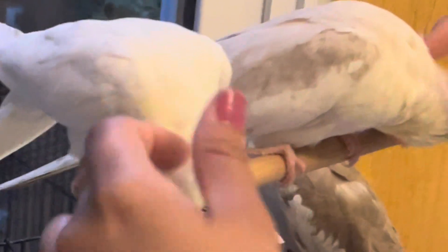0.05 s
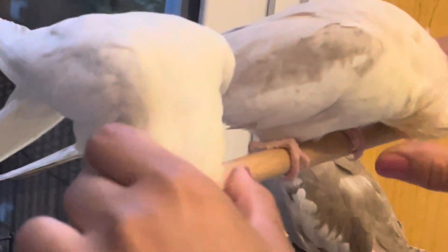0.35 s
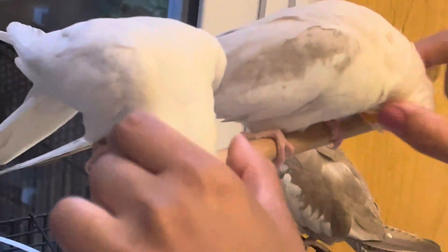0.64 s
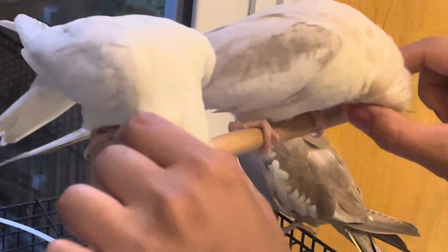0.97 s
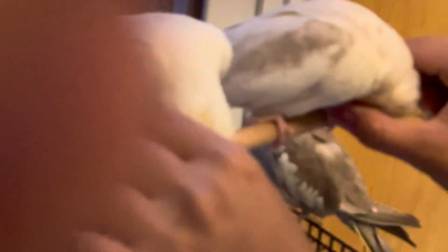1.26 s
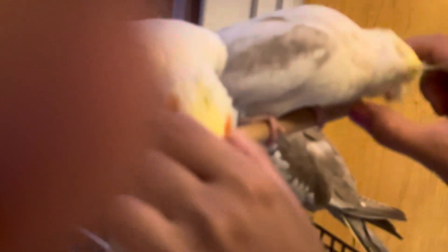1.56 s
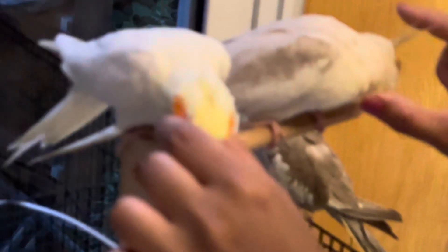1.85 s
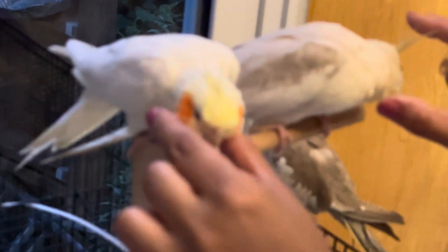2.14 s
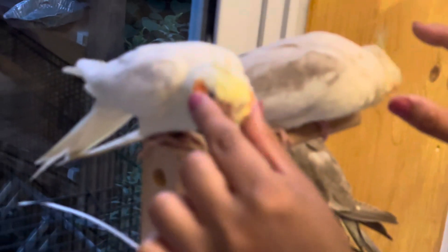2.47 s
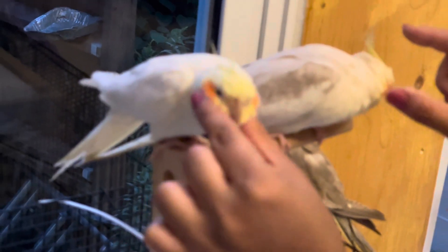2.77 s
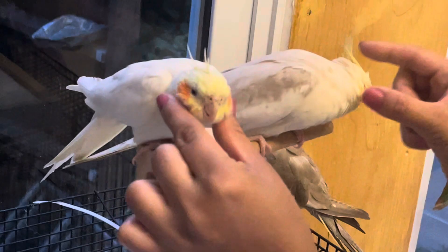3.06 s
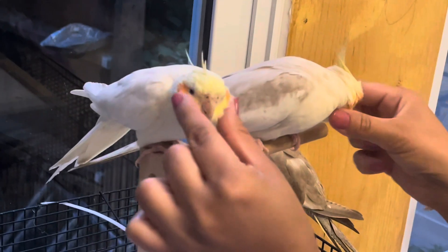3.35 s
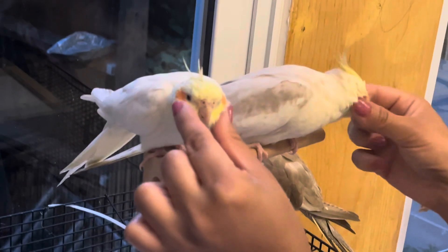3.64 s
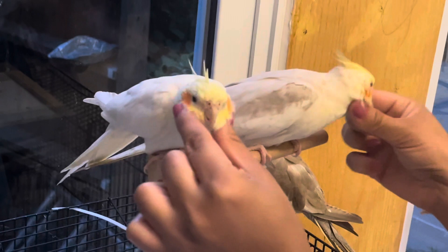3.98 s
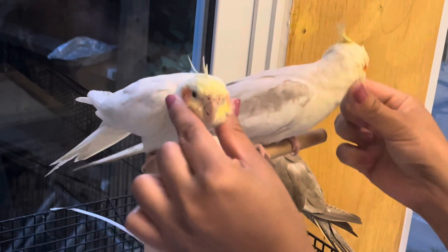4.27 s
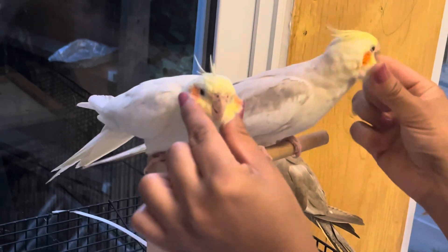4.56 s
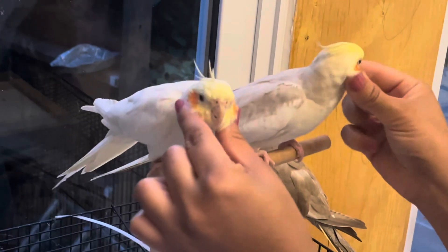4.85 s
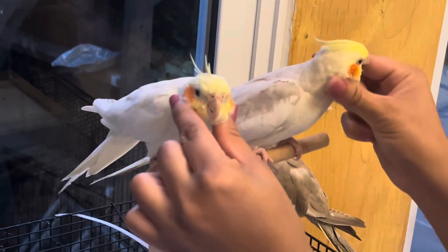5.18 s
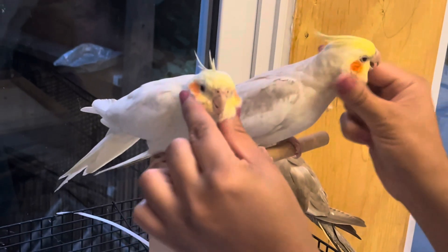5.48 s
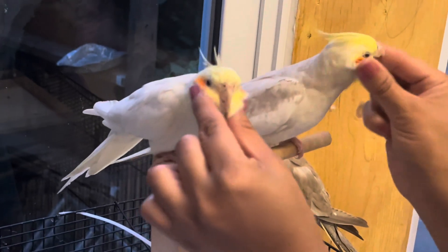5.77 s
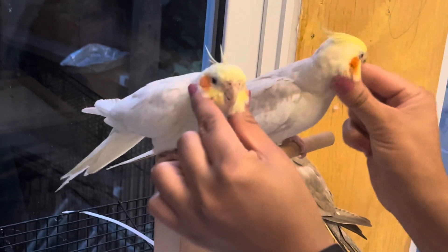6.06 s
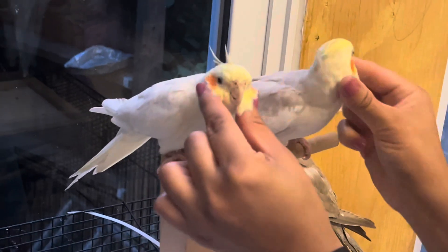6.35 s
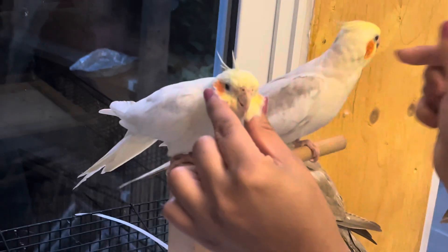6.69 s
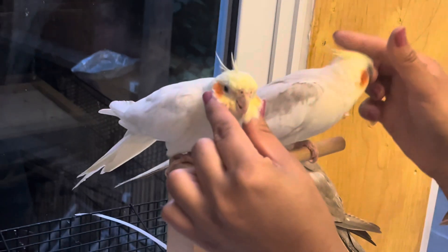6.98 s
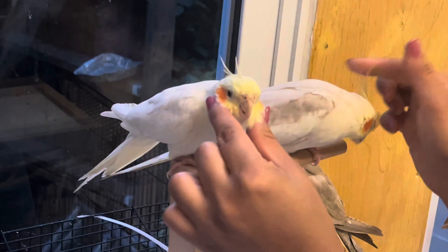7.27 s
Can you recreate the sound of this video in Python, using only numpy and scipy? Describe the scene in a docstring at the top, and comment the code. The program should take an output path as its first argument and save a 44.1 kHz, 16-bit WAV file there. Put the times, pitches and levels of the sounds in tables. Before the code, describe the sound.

A faint appliance hum and a soft rumble of air fill a small room, where two cockatiels are heard close to a phone. One gives high, nearly pure peeps and later thin, quavering whines. The other cuts in five times with short, harsh, louder squawks, the last two close together near the end. Tiny beak clicks and soft feather rustles fall between the calls, and a quick rustle comes last.

```python
"""Two cockatiels have their heads scratched, close to a phone in a small room. From the start an
appliance hums over a soft rumble of air. One bird gives clean peeps, the nearly pure tones of a
vibrating membrane, while beaks tick and feathers rustle. At 0.7 s the other first protests: its squawk
opens reedy, then breaks into a screech as the membrane turns chaotic. From 1.9 s the first bird adds
sagging whines. The calls alternate until two last squawks, near 6.5 s; a brief rustle ends the scene."""
import sys
import numpy as np
from scipy import signal
from scipy.fft import rfft, irfft, next_fast_len
from scipy.io import wavfile
from scipy.ndimage import uniform_filter1d

SR = 44100
rng = np.random.default_rng(int(sys.argv[2]) if len(sys.argv) > 2 else 0)


def put_to_file(sound):
    """Save the sound as 16-bit audio at rate SR, in the file named by the first command-line argument."""
    columns = np.atleast_2d(sound).T  # one column per channel
    safe = np.clip(columns, -1, 1)
    whole_steps = np.round(safe * 32767)
    wavfile.write(sys.argv[1], SR, whole_steps.astype(np.int16))


N = 327222
TIME = np.arange(N) / SR
TOP_HZ = 15500

# Spectrum of the moving air. Each row: frequency in Hz, relative density in dB.
AIR_SPECTRUM = [(22, -41.5), (32, -12), (41, 1.5), (55, 2), (85, -4.5), (140, -12.5), (230, -8.5),
                (330, -14.5), (500, -22), (1000, -31), (2400, -44), (3200, -52), (7000, -53), (12000, -50)]
# Stereo width of the air. Each row: frequency in Hz, side against mid in dB.
AIR_SIDE = [(30, -25), (90, -15), (200, -10.5), (600, -7), (8000, -6.5)]
# Partials of the appliance. Each row: frequency in Hz, median rms level in dB.
HUM_PARTIALS = [(58, -61.5), (231, -60.5), (349.9, -74)]
# Peeps. Each row: start in seconds, length in seconds, pitch in Hz, level in dB, overtone gain in dB.
PEEP_NOTES = [ (.223, 0.024, 2722, -37.5, -11.5), (0.309, 0.038, 2552, -42, -14),
              (0.411, 0.037, 2432, -43.5, -20.5), (0.558, 0.038, 2463, -43.5, -18.5),
              (1.279, 0.012, 4870, -67, -27.5), (1.753, 0.023, 2613, -39.5, -6.5),
              (1.896, .024, 2540, -46.5, -4.5), (3.682, .024, 2013, -43, 5),
              (4.681, 0.037, 2725, -39.5, -3.5), (4.771, .031, 2466, -48, -1.5),
              (4.865, 0.035, 2462, -47, -3), (6.022, 0.011, 2770, -57.5, -15.5),
              (6.097, .016, 2690, -57, -22)]
# Transmission of overtones by the nearly closed beak. Each row: frequency in Hz, gain in dB.
BEAK_RESPONSE = [(5000, -4), (7600, -17), (10000, -20), (13000, -41.5)]
# Impacts of beaks and claws. Each row: start in seconds, strength in dB, ring frequency in Hz.
HORN_IMPACTS = [(0.225, -37.5, 2870), (0.422, -48.5, 3380), (.987, -36.5, 11500), (1.749, -37.5, 3270),
                (4.698, -40, 3560), (4.772, -42, 3200), (5.052, -42.5, 2510), (5.094, -49.5, 2850),
                (5.195, -57.5, 3400), (5.26, -50, 3300), (5.279, -55.5, 5950), (5.689, -49, 2264),
                (6.068, -37, 2295), (6.085, -40.5, 2450)]
# Feather strokes. Each row: start in seconds, length in seconds, level before the mix in dB, centre in Hz.
FEATHER_STROKES = [(0.346, .03, -67.5, 10700), (0.589, 0.039, -63, 9600), (.72, .26, -53, 12300),
                   (1.111, 0.043, -56.5, 10600), (1.422, 0.052, -55, 8580), (1.545, 0.057, -58.5, 10640),
                   (1.932, 0.083, -68, 7200), (4.274, 0.11, -72.5, 6030), (6.065, 0.038, -62, 8540),
                   (6.255, .1, -54.5, 7200), (7.39, 0.016, -47, 10100), (7.41, 0.0092, -35, 7520)]
# Squawks. Each row: start, length, scoop time and time to the break in seconds; first, opening, screech
# and last pitch in Hz; opening and screech level before the mix in dB; fade over the screech in dB;
# screech roughness from 0 to 1; opening and screech tilt of the membrane's spectrum in dB per octave.
SQUAWK_CALLS = [ (0.702, .18, .038, 0.06, 1320, 1630, 2138, 951, -29, -26.5, 9, 0.83, 1.5, -4.5),
                (2.324, 0.15, .027, 0.06, 1383, 1520, 2203, 1407, -30.5, -20.5, 17.5, 0.78, -1, -3),
                (3.69, .147, .042, .063, 927, 1311, 2610, 2678, -24, -17.5, 18.5, .62, -2.5, -4.5),
                (6.465, .113, .038, .042, 1345, 1597, 2010, 1770, -34.5, -29.5, 18.5, 0.65, -3, 5.5),
                (6.639, 0.15, .026, .057, 1299, 1594, 2028, 1156, -26, -26.5, 9, 0.76, 1.5, -5.5)]
# Throat resonances, which shift as neck and beak move. Each row: one squawk's pairs of frequency in Hz
# and gain in dB.
THROAT_RESONANCES = [
    [(1850, -9), (2300, 16), (3380, 7), (4420, -34.5), (5900, -13), (7100, -11), (8600, -8.5)],
    [(1850, -11.5), (2270, 9.5), (3350, 2), (4570, -5), (5950, -12), (7300, -17), (8800, -7.5)],
    [(1850, -9.5), (2650, 3.5), (3880, 1.5), (5120, -16.5), (6000, -25), (7800, -4.5), (11600, -7)],
    [(1850, -23), (2150, 21), (3400, 10.5), (5000, -0.5), (6300, -18), (7100, -1.5), (8500, -5)],
    [(1800, 6), (2250, 21), (3250, 11.5), (4750, 4.5), (6300, -9), (8100, 2.5), (9300, -33)],
]
# Whines. Each row: start and length in seconds, first and lowest pitch in Hz, sag time in seconds,
# level in dB, overtone gain in dB, quaver as a share of the pitch, strength of beak chatter in dB.
WHINE_NOTES = [ (1.938, .24, 2448, 2328, 0.054, -49.5, -5.5, 0.016, -53.5),
               (3.257, 0.29, 2720, 2340, 0.23, -46.5, -4.5, .021, -51),
               (6.166, 0.152, 2614, 2330, .16, -44.5, -3.5, 0.011, -47)]
# Treble resonances of the microphone ports. Each row: frequency in Hz, gain in dB.
PORT_RESPONSE = [(9300, 0.5), (10200, -15.5), (11200, 4), (12600, -8), (13600, -22)]


def undb(db):
    """Amplitude ratio of a level in decibels."""
    return 10 ** (np.asarray(db) / 20)


def unit(x):
    """Normalisation to rms 1."""
    return x / np.sqrt(np.mean(x ** 2) + 1e-20)


def response(points, hz):
    """Gain of a (Hz, dB) curve, interpolated over log frequency."""
    at, db = np.transpose(points)
    return undb(np.interp(np.log(np.maximum(hz, 1)), np.log(at), db))


def colour(x, points):
    """Zero-phase filtering by a (Hz, dB) curve."""
    size = next_fast_len(len(x))
    hz = np.arange(size // 2 + 1) * SR / size
    return irfft(rfft(x, size) * response(points, hz), size)[:len(x)]


def wobble(size, rate_hz):
    """Low-passed noise: smooth random motion of rms 1."""
    lowpass = signal.butter(2, rate_hz, fs=SR, output="sos")
    return unit(signal.sosfilt(lowpass, rng.standard_normal(size)))


def add(out, start, sound):
    """Superposition of a sound at its start time."""
    i = max(int(start * SR), 0)
    out[i:i + len(sound)] += sound[:max(N - i, 0)]


def blend(a, b, share):
    """Linear interpolation from a to b."""
    return a + (b - a) * share


def ease(x):
    """Raised-cosine step from 0 to 1."""
    return np.sin(np.pi / 2 * np.clip(x, 0, 1)) ** 2


def envelope(length_s, attack_s, release_s):
    """Time axis and amplitude envelope of one call."""
    t = TIME[:int(length_s * SR)]
    return t, ease(t / attack_s) * ease((length_s - t) / release_s)


def room_air(mid_db=-55.5):
    """Moving air gives low noise, partly correlated between the two channels."""
    mid, side = (unit(colour(rng.standard_normal(N), AIR_SPECTRUM)) for _ in range(2))
    return undb(mid_db) * (mid + colour(side, AIR_SIDE) * np.array([[1], [-1]]))


def appliance_hum(drift=0.012, throb_db=2.5):
    """Low partials waver under slow random modulation of frequency and amplitude."""
    out = np.zeros(N)
    for hz, db in HUM_PARTIALS:
        gain = undb(db + throb_db * wobble(N, 15))
        drifting_hz = hz * (1 + drift * wobble(N, 5))
        out += gain * unit(np.sin(2 * np.pi * np.cumsum(drifting_hz) / SR))
    return out


def syrinx(hz, weights):
    """A periodically vibrating membrane gives a harmonic series, one row of weights per harmonic."""
    k = np.arange(1, len(weights) + 1)[:, None]
    weights = weights * (k * hz < TOP_HZ)
    phase = 2 * np.pi * np.cumsum(hz) / SR
    rms = np.sqrt((weights ** 2).sum(axis=0) / 2 + 1e-20)
    return (weights * np.sin(k * phase)).sum(axis=0) / rms


def whistle(hz, overtone_db, waver, air_db, shimmer_db=3, count=5):
    """The closed beak acts as a low-pass filter, leaving a trembling, nearly pure tone and faint breath."""
    hz = hz * (1 + waver * wobble(len(hz), 99))
    overtones = [undb(overtone_db) * response(BEAK_RESPONSE, k * hz) for k in range(2, count + 1)]
    tone = syrinx(hz, np.array([np.ones(len(hz))] + overtones))
    breath = colour(rng.standard_normal(len(hz)), [(1500, -24.5), (3000, 9.5)] + BEAK_RESPONSE)
    shimmer = undb(shimmer_db * wobble(len(hz), 71))
    return (tone + undb(air_db + overtone_db) * unit(breath)) * shimmer


def peeps(sharp=0.04, settle_s=0.011):
    """Short contact notes with an onset transient: the pitch starts sharp and settles exponentially."""
    out = np.zeros(N)
    for start, length, pitch_hz, db, overtone_db in PEEP_NOTES:
        t, swell = envelope(length, attack_s=0.17 * length, release_s=0.45 * length)
        hz = pitch_hz * (1 + sharp * np.exp(-t / settle_s))
        add(out, start, swell * undb(db) * whistle(hz, overtone_db, waver=0.011, air_db=-21.5))
    return out


def ticks(impacts, crack=0.33, ring_s=0.001, crack_s=0.0015):
    """An impact on hard horn excites a tiny crack and one heavily damped mode."""
    out, t = np.zeros(N), TIME[:SR // 50]
    for start, db, hz in impacts:
        snap = crack * rng.standard_normal(len(t)) * np.exp(-t / crack_s)
        ring = np.sin(2 * np.pi * hz * t) * np.exp(-t / ring_s)
        band = [(hz / 4, -18), (hz / 2, -3), (hz, 0), (hz * 3, -14)]
        add(out, start, undb(db) * colour(ring + snap, band))
    return out


def rustles(grain_db=3):
    """Friction between sliding feather barbs gives a grainy band of noise."""
    out = np.zeros(N)
    for start, length, db, hz in FEATHER_STROKES:
        size = int(length * SR)
        barbs = rng.standard_normal(size) * undb(grain_db * wobble(size, 500))
        swish = colour(barbs, [(hz / 10, -32), (hz / 2, -12), (hz, 0), (hz * 2, -26)])
        swell = np.sin(np.pi * np.linspace(0, 1, size) ** 0.7)
        add(out, start, undb(db) * unit(swish * swell))
    return out


def throat(x, resonances, q=10):
    """Windpipe and open beak act as resonators in parallel."""
    return sum(undb(db) * signal.lfilter(*signal.iirpeak(hz, q, fs=SR), x) for hz, db in resonances)


def forced_voice(hz, rough, tilt_db, resonances, jitter=0.18, flutter_db=3, rasp_db=-14, count=10):
    """Source and filter: a membrane driven into chaos and rasping air excite the same throat."""
    size, k = len(hz), np.arange(1, count + 1)[:, None]
    shaken_hz = hz * (1 + jitter * rough * np.tanh(wobble(size, 300)))
    tone = syrinx(shaken_hz, undb(tilt_db * np.log2(k)))
    rasp = undb(rasp_db) * rough * rng.standard_normal(size)
    voice = throat(tone + rasp, resonances)
    # so small a throat radiates almost no bass
    radiation = [(500, -31.5), (1000, -10.5), (1350, -11), (1800, 6), (9000, -0.5), (14000, -21.5)]
    voice = colour(voice, radiation)
    # effort alone sets the loudness, wherever the pitch lies among the resonances
    voice = voice / np.sqrt(uniform_filter1d(voice ** 2, size=400) + 1e-12)
    return voice * unit(undb(flutter_db * rough * wobble(size, 230)))


def squawks(scoop_db=11.5, push_db=3, dull_db=10.5, opening_rough=0.26, closing_rough=0.5):
    """A change of regime: a reedy note scoops up, breaks into a screech and sags as the air runs out."""
    out = np.zeros(N)
    for row, resonances in zip(SQUAWK_CALLS, THROAT_RESONANCES):
        (start, length, scoop_s, break_s, first_hz, opening_hz, screech_hz, last_hz,
         opening_db, screech_db, fade_db, screech_rough, opening_tilt, screech_tilt) = row
        t, gate = envelope(length, attack_s=0.0057, release_s=0.005)
        effort = ease(t / scoop_s)
        broken = (1 + np.tanh((t - break_s) / 0.009)) / 2  # 0 in the opening, 1 in the screech
        spent = np.clip((t - break_s) / (length - break_s), 0, 1)
        sag = spent ** 2.8  # ever faster towards the end
        hz = blend(blend(first_hz, opening_hz, effort), blend(screech_hz, last_hz, sag), broken)
        rising_db = opening_db - scoop_db * (1 - effort)
        # a last push of air lifts the level halfway down the sag
        falling_db = screech_db - fade_db * spent + push_db * np.sin(np.pi * sag)
        db = blend(rising_db, falling_db, broken)
        rough = blend(opening_rough, blend(screech_rough, closing_rough, sag), broken)
        tilt_db = blend(opening_tilt, screech_tilt - dull_db * np.sin(np.pi * spent), broken)
        add(out, start, gate * undb(db) * forced_voice(hz, rough, tilt_db, resonances))
    return out


def whines(rise_hz_per_s=380, fade_db=3.5, dull_db=3.5):
    """Frequency glides: a fading, dulling whistle sags, then creeps back up if it lasts long enough."""
    out = np.zeros(N)
    for start, length, first_hz, lowest_hz, sag_s, db, overtone_db, quaver, _ in WHINE_NOTES:
        t, swell = envelope(length, attack_s=0.005, release_s=0.012)
        spent = t / length
        sagging_hz = blend(lowest_hz, first_hz, np.maximum(1 - t / sag_s, 0) ** 2)
        hz = sagging_hz + rise_hz_per_s * np.maximum(t - sag_s, 0)
        note = whistle(hz, overtone_db - dull_db * spent, quaver, air_db=-19)
        add(out, start, swell * undb(db - fade_db * spent) * note)
    return out


def beak_chatter(gap_s=0.026, scatter_db=3, ring_hz=3070):
    """A jittered train of faint beak impacts during each whine, as rows for ticks()."""
    impacts = []
    for start, length, *_, db in WHINE_NOTES:
        for slot in np.arange(start, start + length - gap_s, gap_s):
            impacts.append((slot + gap_s * rng.random(), db + scatter_db * rng.standard_normal(), ring_hz))
    return impacts


def room(x, wet_db, early_db, side_db, t60_s=0.49, early_s=0.016):
    """Reverberation: sparse reflections from the nearby door and window, and a diffuse decaying tail."""
    t = TIME[:int(0.75 * SR)]
    arrive = np.clip((t - 0.002) / 0.016, 0, 1)
    paths = []
    for _ in range(2):
        tail = rng.standard_normal(len(t)) * arrive * np.exp(-np.log(1000) * t / t60_s)
        tail = colour(tail, [(3000, 3.5), (9000, 0.5), (14000, -13)])
        sparse = rng.standard_normal(len(t)) * (rng.random(len(t)) < 0.02)
        early = sparse * arrive * np.exp(-t / early_s)
        impulse = (undb(wet_db) * unit(tail) + undb(early_db) * unit(early)) / np.sqrt(len(t))
        paths.append(signal.fftconvolve(x, impulse)[:N])
    mid, side = paths
    return x + mid + undb(side_db) * side * np.array([[1], [-1]])


def delay(x, lag_s):
    """A linear phase shift delays by any fraction of a sample."""
    return irfft(rfft(x) * np.exp(-2j * np.pi * np.fft.rfftfreq(N, 1 / SR) * lag_s), N)


def scene(lag_s=1.3e-5):
    """Directivity: the peeping bird faces the phone; the other, turned away, comes more by the walls."""
    direct = peeps() + whines() + ticks(HORN_IMPACTS + beak_chatter())
    soft = room(direct, wet_db=-12, early_db=-14, side_db=-5)
    harsh = room(squawks(), wet_db=-3.5, early_db=-4, side_db=-9.5)
    feathers = room(rustles(), wet_db=-9, early_db=-5.5, side_db=-12.5)
    left, right = soft + undb(-3.5) * harsh + undb(-7) * feathers
    # the birds are a little nearer the left microphone
    return np.array([left, delay(right, lag_s)]) + room_air() + appliance_hum()


def record(dry):
    """Port resonances of the phone colour the high treble, and a steep low-pass cuts the top."""
    heard = np.array([colour(channel, PORT_RESPONSE) for channel in dry])
    return signal.sosfilt(signal.ellip(8, 0.2, 70, TOP_HZ, fs=SR, output="sos"), heard)


dry = scene()
out = record(dry)
put_to_file(out)
```